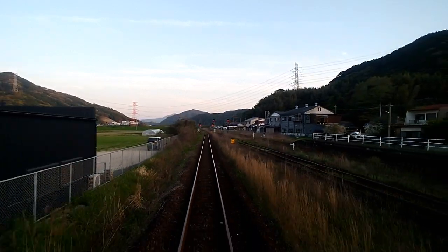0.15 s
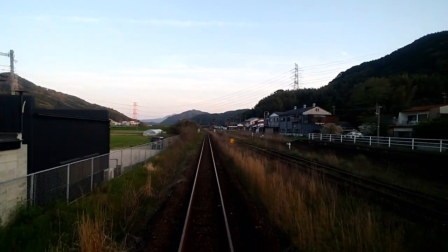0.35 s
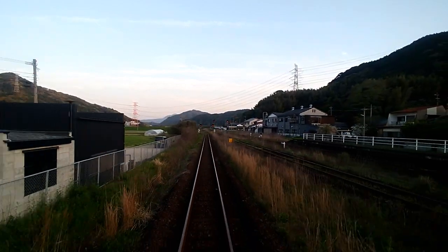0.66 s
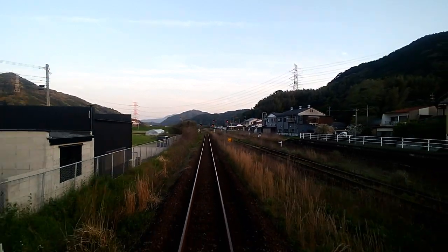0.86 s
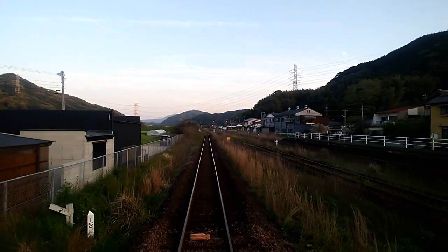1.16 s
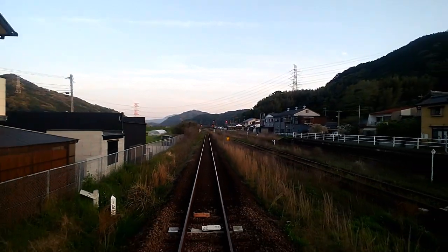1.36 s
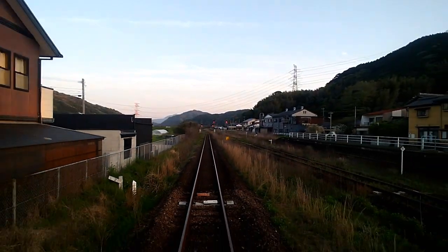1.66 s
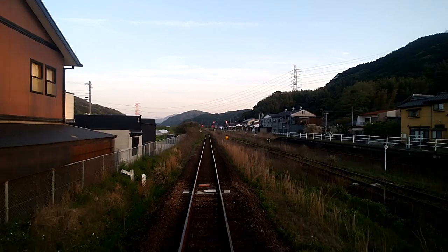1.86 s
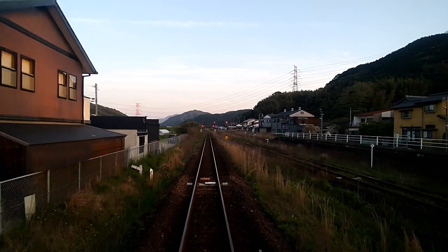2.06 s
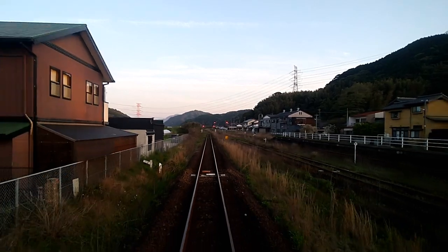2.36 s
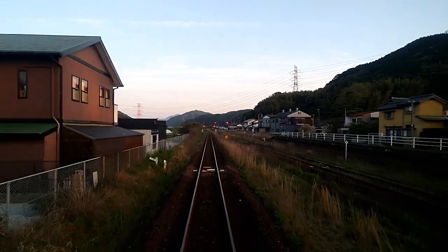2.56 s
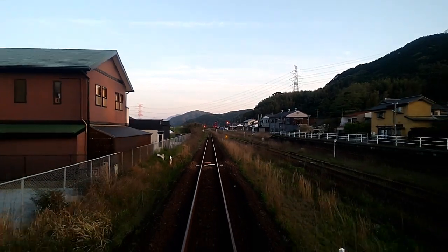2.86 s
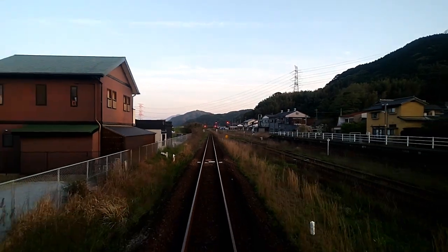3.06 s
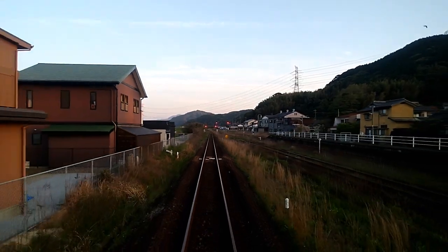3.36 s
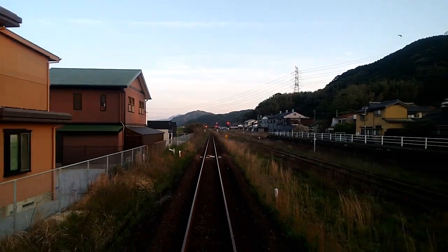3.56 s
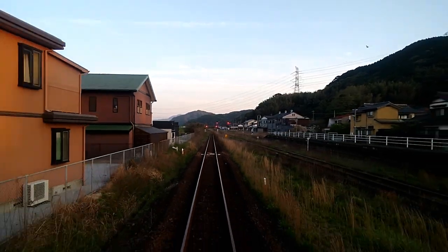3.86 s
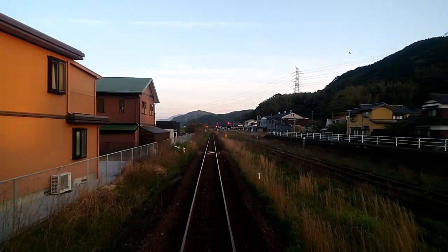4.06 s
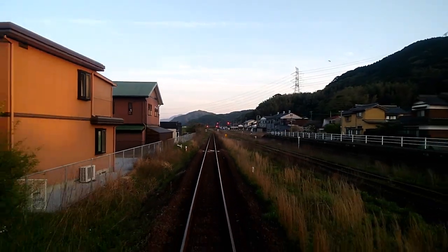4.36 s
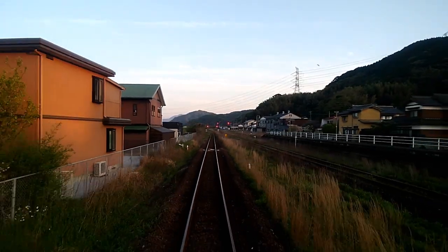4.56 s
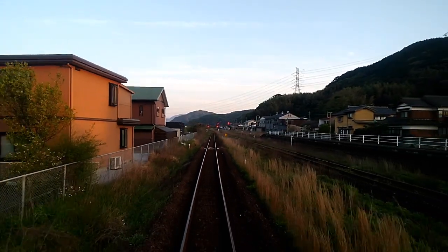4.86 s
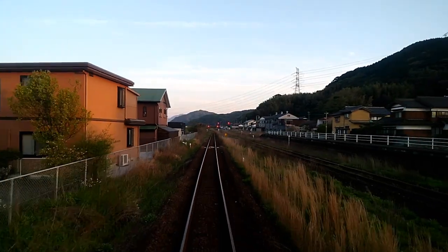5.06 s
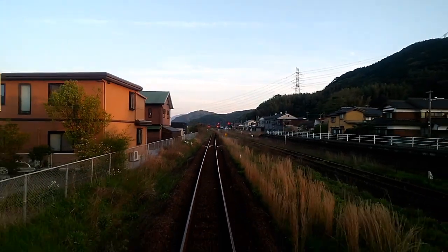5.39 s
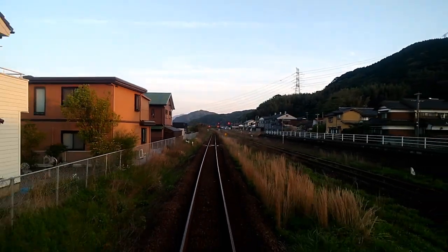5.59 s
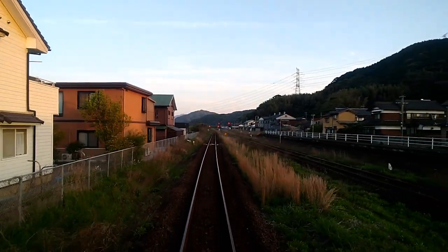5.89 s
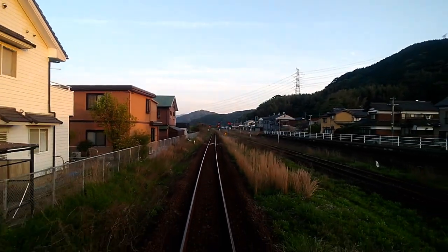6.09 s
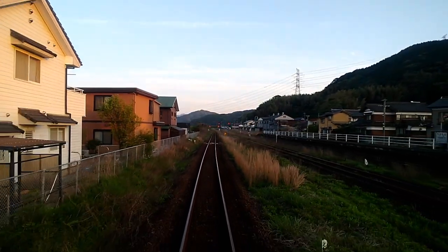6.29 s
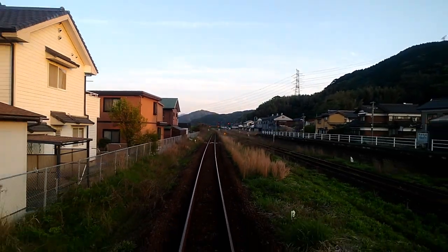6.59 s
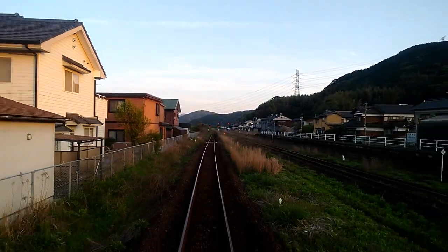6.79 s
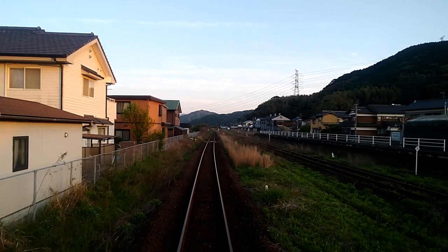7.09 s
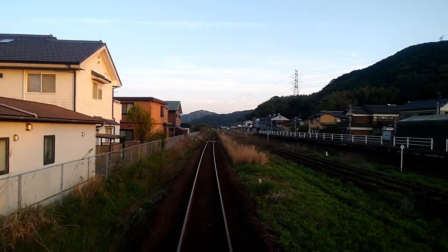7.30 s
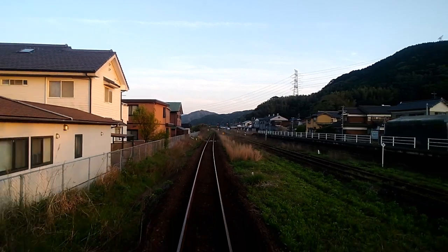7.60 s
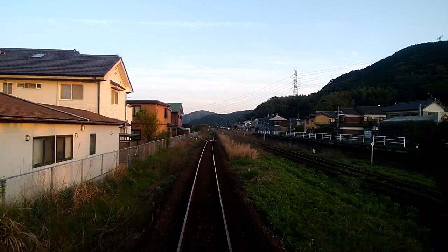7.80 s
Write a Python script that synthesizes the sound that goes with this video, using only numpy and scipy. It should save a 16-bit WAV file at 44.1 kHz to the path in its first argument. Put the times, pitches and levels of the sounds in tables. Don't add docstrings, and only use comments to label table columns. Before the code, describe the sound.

Inside the front cab of a slow diesel railcar, a deep boom and rolling roar run throughout. At first a brake shoe rubs a wheel, making a thin, very high wavering squeal and dry hiss; after about a second and a half it lets go with a soft air sigh. Wheels thump unevenly over rail joints, setting loose panes chattering and trim ticking. Close stereo microphone in the cab.

```python
import sys
import numpy as np
from scipy import signal
from scipy.fft import rfft, irfft, next_fast_len
from scipy.io import wavfile
from scipy.ndimage import uniform_filter1d

SR = 44100
rng = np.random.default_rng(int(sys.argv[2]) if len(sys.argv) > 2 else 0)


def master_out(mix):
    frames = np.transpose(np.atleast_2d(mix))
    ceiling = np.clip(frames, -1, 1)
    pcm = np.round(ceiling * 32767).astype(np.int16)
    wavfile.write(sys.argv[1], SR, pcm)


def voltage_ratio(decibels):
    exponent = np.asarray(decibels, float) / 20
    return 10 ** exponent


N = 350154
TIME = np.arange(N) / SR
SLOW = TIME[::32]
LONG = next_fast_len(N, real=True)
HZ = np.maximum(np.fft.rfftfreq(LONG, 1 / SR), 1)
LEFT_RIGHT = np.array([[1], [-1]])
SWING_S = 0.0111


def unit(x):
    return x / np.sqrt(np.mean(np.abs(x) ** 2))


def curves(rows):
    s, *columns = np.transpose(rows)
    return [np.interp(TIME, s, column) for column in columns]


def over_hz(points):
    hz, value = np.transpose(points)
    return np.interp(np.log(HZ), np.log(np.maximum(hz, 1)), value)


def walk(rate_hz):
    hold = int(SR / rate_hz)
    steps = np.repeat(rng.standard_normal(N // hold + 1), hold)
    return unit(uniform_filter1d(uniform_filter1d(steps, hold), hold)[:N])


def spell(start_s, rise_s, fall_db_s):
    t = np.maximum(TIME - start_s, 0)
    return (1 - np.exp(-t / rise_s)) * voltage_ratio(-fall_db_s * t)


def sing(hz, width_hz, steady, order=2):
    pole = np.exp(-np.pi * width_hz * SLOW[1])
    push = rng.standard_normal(2 * len(SLOW)) + 1j * rng.standard_normal(2 * len(SLOW))
    swing = unit(signal.lfilter([1], np.poly([pole] * order), push)[len(SLOW):])
    swing = unit(swing / (abs(swing) + .1) ** steady)
    turn = np.exp(2j * np.pi * np.cumsum(hz + 0 * TIME) / SR)
    return np.sqrt(2) * np.interp(TIME, SLOW, swing) * turn


def spread(first, second, like, pan_db):
    like = np.clip(like, 0, .99)
    pair = first + LEFT_RIGHT * np.sqrt((1 - like) / (1 + like)) * second
    return np.real(pair) * voltage_ratio(LEFT_RIGHT * pan_db / 2)


# hz, likeness (0-1)
LIKENESS = [(60, 0.9), (130, 1), (280, 0.82), (610, 0.7), (1320, 0), (2860, 0.1), (6190, 0), (13400, 0)]
# hz, left_minus_right_db
LEAN = [(60, 1), (110, -1.5), (200, 0), (360, -1), (660, -1), (1210, 6), (2210, -1.5), (4030, 1.5),
        (7350, -2), (13400, -8)]


def stereo_noise(colour, band_hz, flicker_db, source=None):
    if source is None:
        source = rng.standard_normal((2, N))
    mid, side = rfft(source, LONG)
    like = np.clip(over_hz(LIKENESS), 0, .99)
    pair = np.sqrt(1 + like) * mid + LEFT_RIGHT * np.sqrt(1 - like) * side
    pair = pair * voltage_ratio(over_hz(colour) + LEFT_RIGHT * over_hz(LEAN) / 2)
    low_hz, high_hz = colour[0][0], colour[-1][0]
    pair = pair * ((HZ > low_hz) & (HZ < high_hz))
    inside = irfft(pair.mean(axis=0) * ((HZ > band_hz[0]) & (HZ < band_hz[1])), LONG)
    out, place = 0, 2 * np.log2(HZ)
    for centre in np.arange(np.floor(2 * np.log2(low_hz)), 2 * np.log2(high_hz) + 1, 2):
        band = pair * np.clip(1 - abs(place - centre) / 2, 0, 1)
        out = out + irfft(band, LONG)[:, :N] * voltage_ratio(flicker_db * walk(9))
    return out / np.sqrt(np.mean(inside ** 2))


# start_s, pitch_hz, gain_db, half_length_s
SWELLS = [(.5, 752, -4, .6), (1.25, 752, 4, .12), (1.83, 752, 8, .12), (3.07, 752, 6, .1),
          (4.3, 752, 5, .2), (5.55, 752, 3, .1), (6.65, 752, 3, .1), (1.1, 238, 5, .1), (1.42, 238, 6, .07),
          (1.78, 238, 6, .07), (2.55, 238, 4, .1), (3.4, 238, 6, .07), (5.45, 238, 7, .13),
          (6.6, 238, 4, .1), (1.55, 560, 6, .15), (2.35, 560, 9, .08), (2.93, 560, 7, .06),
          (.9, 1453, 4, .1), (3.62, 1453, 4, .05), (5.7, 1453, 3, .4), (.045, 5324, 4, .04),
          (.2, 5324, 4, .06), (.7, 5324, 4, .1), (.88, 5324, -4, .05), (1.1, 5324, 4, .08),
          (1.28, 5324, -6, .07), (.2, 10717, 6, .05), (.33, 10717, -3, .06), (.5, 10717, 3, .05),
          (.82, 10717, 5, .08), (1.0, 10717, -3, .07), (1.14, 10717, 4, .04), (1.29, 10717, 7, .05),
          (3.6, 6000, 5, .2), (4.9, 6000, 5, .3), (6.9, 6000, 5, .3)]


def swells(hz):
    near = [row for row in SWELLS if abs(np.log(row[1] / hz)) < np.log(2) / 16]
    return sum(db * np.exp(-((TIME - s) / half_s) ** 2) for s, _, db, half_s in near)


# start_s, thump_peak_db, lower_shell_kick_db, upper_shell_kick_db
JOINTS = [(0.0, -36, -33, -23), (0.16, -18, -32, -23.5), (0.6, -37, -28, -32), (.9, -45, -28, -33),
          (1.17, -38, -30, -33), (1.545, -31.5, -23, -28.5), (1.8, -45, -30, -29), (1.95, -45, -25, -36),
          (2.15, -46, -30, -27), (2.47, -34, -30, -30), (2.72, -45, -33, -27), (2.855, -24, -21, -31),
          (3.092, -19, -35, -32), (3.165, -44.5, -40, -20), (3.3, -45, -36, -29), (3.55, -42, -33, -27),
          (3.92, -42, -27, -29.5), (4.2, -46.5, -34, -29.5), (4.371, -46, -30, -30), (4.619, -35, -28, -36),
          (4.72, -45, -26, -36), (4.98, -38, -36.5, -31.5), (6.05, -27.5, -22, -33),
          (6.278, -22.5, -30, -30), (6.34, -38, -21, -30), (6.48, -45, -25, -33), (6.589, -45, -38, -22),
          (6.86, -35.5, -36, -34.5), (7.2, -42.5, -35.5, -32.5)]
KICK_FALL_DB_S = [30, 15]


def shell_swings():
    rest_db, lead_s, rise_s = -35, .01, .0082
    swings = []
    for mode, fall_db_s in enumerate(KICK_FALL_DB_S):
        kicks = sum((voltage_ratio(row[2 + mode]) * spell(row[0] - lead_s, rise_s, fall_db_s)) ** 2 for row in JOINTS)
        swings.append(np.sqrt(voltage_ratio(2 * rest_db) + kicks))
    return swings


# start_s, lower_pitch_hz, upper_pitch_hz
SHELL_PITCH = [(0, 88.1, 108.1), (.5, 82.02, 114.9), (1.56, 72.98, 110.1), (1.78, 87.87, 115.8),
               (2.1, 90, 112), (2.5, 80, 114), (2.86, 78.98, 116), (3.06, 100, 114), (3.249, 86, 117),
               (3.75, 84.02, 112.1), (4.0, 94.06, 118), (4.4, 84, 114), (4.78, 91.9, 116),
               (5.2, 84.9, 118.9), (6.05, 86, 105.9), (6.4, 97, 108), (6.7, 84, 110), (7.94, 82, 113)]
# width_hz, steadiness (0-1)
SHELL = [(15, .55), (9, .9), (22, 0.4)]


def boom(swings):
    gains = swings + [voltage_ratio(-15.5) * np.hypot(*swings)]
    pitches = curves(SHELL_PITCH) + [148]
    out = 0
    for gain, hz, (width_hz, steady) in zip(gains, pitches, SHELL):
        mode = spread(sing(hz, width_hz, steady), sing(hz, 2 * width_hz, .2), 0.97, -1.0)
        out = out + gain * voltage_ratio(1.1 * walk(7)) * mode
    return np.tanh(4.5 * out) / 4.35


# hz, level_db (per Hz)
PANELS = [(12, -61.5), (20, -27), (32, -35), (48, -28.5), (57, -30.5), (68, -1.5), (107, 1), (129, 1),
          (147, -8), (177, -14), (203, -20), (236, -15), (275, -23), (344, -35), (400, -33.5), (520, -58),
          (880, -120)]
# hz, level_db (per Hz)
ROAR = [(160, -35.5), (280, -1.5), (450, -7), (590, -6), (800, -11), (1300, -17), (1600, -14), (2400, -26),
        (3000, -30.5), (3700, -36), (5400, -44.5), (6300, -47), (11400, -56.5), (16000, -70)]
# pitch_hz, width_hz, level_db
FRAME = [(238, 15, -49), (413.6, 20, -57.5), (491, 26, -59.5), (560, 30, -63), (752, 12, -62.5),
         (1453, 44, -64), (2850, 300, -76), (4600, 410, -88), (5220, 45, -88), (6000, 25, -94)]


def body():
    swings = shell_swings()
    shake_db = 20 * np.log10(np.hypot(*swings)) + 25
    jolt = sum(np.exp(-((TIME - s - .02) / .11) ** 2) * np.clip((db + 47) / 25, 0, 1) for s, db, _, _ in JOINTS)
    braking = np.clip((RELEASE_S - TIME) / 0.26 + 1, 0, 1)
    panel_db = -39 + 0.55 * shake_db + 1.5 * walk(6)
    roar_db = -50.5 + 0.14 * shake_db + 2.5 * jolt + 2.5 * braking
    gap = [(hz, db - 7.3 * (65 < hz < 135)) for hz, db in PANELS]
    out = boom(swings)
    out = out + voltage_ratio(panel_db) * stereo_noise(gap, (150, 350), 1.7)
    out = out + voltage_ratio(roar_db) * stereo_noise(ROAR, (400, 2500), 1.3)
    for hz, width_hz, db in FRAME:
        ring = spread(sing(hz, width_hz, 0.1), sing(hz, width_hz, 0.18), min(150 / hz, 1), 0)
        out = out + voltage_ratio(db + swells(hz) + 1.2 * walk(5)) * ring
    return out


# pitch_hz, level_db, t60_s
THUMP = [(121, -9, 0.2), (145, 5, 0.16), (184.8, 5.5, 0.12), (215, 6.5, 0.14), (249, 3.5, .11),
         (300, -1, 0.1), (382, -7, 0.082), (473, -8, 0.12), (601, -9, .08), (865, -12, .07)]


def joints():
    out, t = np.zeros(N), TIME[:SR // 2]
    push = (1 - np.exp(-t / .02)) ** 2
    chance = rng.standard_normal((len(JOINTS), len(THUMP), 3))
    for (s, peak_db, _, _), draw in zip(JOINTS, chance):
        ring = 0
        for (hz, db, t60_s), (louder, sharper, phase) in zip(THUMP, draw):
            wave = np.sin(2 * np.pi * hz * (1 + 0.038 * sharper) * t + np.pi * phase)
            ring = ring + voltage_ratio(db + 1.7 * louder) * wave * 1000. ** (-t / (1.5 * t60_s))
        i = int(s * SR)
        out[i:i + len(t)] += (voltage_ratio(peak_db - 1.5) * ring * push)[:N - i]
    return spread(out, 0, .9, -1.0)


# start_s, peak_db
HEAVES = [
    (0.019, -31),
    (1.58, -33),
    (4.65, -33),
    (7.74, -37),
]


def heaves():
    heave_hz, half_s = 50, .07
    out = 0
    for s, db in HEAVES:
        t = TIME - s
        out = out + voltage_ratio(db) * np.exp(-(t / half_s) ** 2) * np.sin(2 * np.pi * heave_hz * t)
    return out


RELEASE_S, RELEASE_DB_S = 1.465, 298

# start_s, strongest_ring_db, split_of_that_ring_hz
GRIP = [
    (0.0, -49.5, 34),
    (0.16, -43, 44),
    (0.29, -49.5, 34.5),
    (.37, -44.5, 14.2),
    (.47, -50.5, 44.6),
    (0.62, -45.5, 42),
    (0.87, -49.5, 44),
    (1.1, -46, 23.7),
    (1.23, -38, 11.9),
    (1.45, -48.5, 16),
]
WHEEL_HZ = [7869, 5324, 10717, 3084, 13910, 8431, 6589, 12941]
WHEEL_WIDTH_HZ = [15, 15, 11, 20, 22, 20, 20, 20]
# level_db (against its drive), drive (whole part counts), left_minus_right_db, likeness (0-1)
WHEEL = [(-8.5, 0, -0.5, 0.48), (2, 1, 3, 0.1), (1, 2, -8, .2), (-13, 1, 3, .2), (-25, 1.6, 1, .3),
         (-32, 0, -7, .2), (-21, 1.2, -3, .2), (-33.5, 1.4, -2, .2)]
RING_WANDER_DB = [1.6, .8, 1.0]


def wheel_rings():
    after_s = np.maximum(TIME - RELEASE_S, 0)
    lift_db = np.maximum(-RELEASE_DB_S * after_s, -22 - 45 * after_s)
    level_db, split_hz = curves(GRIP)
    grip_db = level_db + 48
    drives = [db - 47.5 + share * grip_db + wander_db * walk(12.13) + lift_db
              for db, share, wander_db in zip([1.5, -7.5, -11], [0.99, -0.19, .3], RING_WANDER_DB)]
    out = 0
    for hz, width_hz, (db, drive, pan_db, like) in zip(WHEEL_HZ, WHEEL_WIDTH_HZ, WHEEL):
        first, second = (sing(hz, width_hz, .25, order=1) for _ in range(2))
        out = out + voltage_ratio(drives[int(drive)] + db + swells(hz)) * spread(first, second, like, pan_db)

    def twins():
        lower = sing(WHEEL_HZ[0] - split_hz / 2, 10.2, 0.57)
        upper = sing(WHEEL_HZ[0] + 0.99 * split_hz / 2, 10.2, 0.57)
        return lower + voltage_ratio(-2) * upper

    _, _, pan_db, like = WHEEL[0]
    out = out + voltage_ratio(drives[0] - 1.5) * spread(twins(), twins(), like, pan_db)
    return out * (1 + 0.079 * np.real(sing(107, 8, .5)))


# start_s, rise_s, level_db, fall_db_per_s
GRABS = [
    (0.03, .01, -61, 58),
    (0.224, .003, -54, 220),
    (0.427, .004, -51, 150),
    (0.76, .03, -64.5, 40.5),
    (1.11, .005, -64, 147),
]
# hz, level_db (per Hz)
GRAB_COLOUR = [(2500, -21), (4300, -6.5), (5500, -4.5), (7000, -2), (9500, -1), (11300, -4.5), (12300, -18),
               (13500, -40)]
# hz, level_db (per Hz)
RUB_COLOUR = [(1800, -5), (2300, -9.5), (3050, 0.5), (3600, -8.5), (4700, -3.5), (5300, -4), (6300, -3.5),
              (7200, 0), (8500, -0.5), (11100, -3.5), (12000, -16), (13200, -13), (14300, -52),
              (16000, -62)]


def shoe_rub():
    lingers_s = .015
    after_s = np.maximum(TIME - RELEASE_S - lingers_s, 0)
    rub_db = -62 - RELEASE_DB_S * after_s + 1.2 * walk(25)
    grab = sum(voltage_ratio(db) * spell(s, rise_s, fall_db_s) for s, rise_s, db, fall_db_s in GRABS)
    hiss = grab * stereo_noise(GRAB_COLOUR, (8600, 10400), 1.5)
    return hiss + voltage_ratio(rub_db) * stereo_noise(RUB_COLOUR, (8600, 10400), 1.8)


# hz, level_db (per Hz)
AIR_COLOUR = [(1400, -32.5), (2500, -13), (2970, 1.5), (3590, -15), (4350, -4.5), (4750, -9.5), (5600, -14),
              (6800, -9), (8050, -8.5), (10500, -13.5), (13000, -26), (16000, -35.5)]


def brake_air():
    return voltage_ratio(-65.5) * spell(1.49, 0.018, 12) * stereo_noise(AIR_COLOUR, (3500, 12000), 1.9)


# start_s, length_s, level_db, low_part_db, fade_within_swing_db
CHATTER = [(2.8653, .03, -56, -8.5, 11.5), (2.886, .01, -55, -2.5, 7), (2.901, .028, -49.5, -3.5, 8.5),
           (2.9324, .052, -45, -2.5, 7), (3.056, .02, -60, 1, 4), (3.150, .018, -64.5, 3.5, 2.5),
           (3.17, .011, -50, 3, 5.5), (3.187, 0.027, -54, 5, 2.5), (3.314, .01, -64, 9, 2),
           (4.398, .01, -61, 4, 4), (4.612, .012, -62, 7.5, 2), (5.645, .005, -68, 16, 3),
           (6.0605, .006, -48.5, 8, 4.5), (6.073, .022, -49.5, 1, 3.5), (6.106, .018, -53, 5.5, 3.5),
           (6.135, .02, -58, 5.5, 3), (6.32, 0.025, -61, 5.5, 3.5), (6.35, .018, -51.5, 2, 2.5),
           (6.373, .02, -57.5, 1, 2), (6.396, .038, -50, 4, 2.5), (6.441, 0.028, -60.5, 4.5, 4.5),
           (6.606, .008, -59, 7.5, 3)]
# hz, level_db (per Hz)
PANE_HIGH = [(4000, -40), (6200, -13.5), (7100, -2), (8000, -4), (8900, -1.5), (9700, -1), (11200, -10),
             (11900, -9.5), (12600, -12), (16000, -19)]
# hz, level_db (per Hz)
PANE_LOW = [(800, -11), (1500, 9), (1850, 9.5), (2150, 5), (2500, -7.5), (2950, 1.5), (3400, -8.5),
            (3800, -4.5), (4200, -5), (4600, -8), (5100, -11), (5800, -23.5)]
# pitch_hz, width_hz, level_db (against the duller part)
PANE_RINGS = [(1620, 70, -7), (1800, 65, -5.5), (2930, 110, -6), (3830, 70, -5), (4700, 140, -12),
              (5270, 90, -16)]


def chatter():
    rise_s, fall_s = .0012, .009
    knocks = rng.standard_normal((2, 2, N)) * voltage_ratio(4.2 * np.minimum(rng.exponential(size=(2, 1, N)), 5))
    high, low = np.zeros(N), np.zeros(N)
    for s, length_s, level_db, low_db, fade_db in CHATTER:
        t = np.maximum(TIME - s, 0)
        swing = np.minimum(t, length_s) / SWING_S % 1
        edges = (1 - np.exp(-t / rise_s)) * np.exp(-np.maximum(t - length_s, 0) / fall_s)
        shape = voltage_ratio(level_db - 11.5 - fade_db * swing) * edges
        high = np.hypot(high, shape)
        low = np.hypot(low, shape * voltage_ratio(low_db + 2 + .5 * fade_db * (swing - 1.5)))
    keep = np.exp(-1 / (0.13 * SR))

    def linger(level, tail_db):
        tail = signal.lfilter([3 * (1 - keep)], [1, -keep], level ** 2)
        return np.sqrt(level ** 2 + voltage_ratio(2 * tail_db) * tail)

    low, high = linger(low, -13), linger(high, -19)
    rings = sum(voltage_ratio(db) * spread(sing(hz, width_hz, .1), sing(hz, width_hz, .1), .3, -1.0)
                for hz, width_hz, db in PANE_RINGS)
    bright = high * stereo_noise(PANE_HIGH, (8300, 10400), 1.3, knocks[0])
    dull = low * voltage_ratio(-1.1) * stereo_noise(PANE_LOW, (2500, 5000), 2.2, knocks[1])
    return low * rings + bright + dull


# start_s, length_s, peak_db
TICKS = [(.028, .085, -37.5), (0.195, .005, -30), (0.21, .005, -43), (0.223, .027, -41), (0.374, .005, -44),
         (1.1165, .027, -41), (1.553, .005, -51), (1.614, .005, -57.5), (2.21, .005, -57),
         (2.4946, .005, -61), (2.6004, .005, -59), (2.6553, .016, -59), (2.8538, .027, -59.5),
         (3.0905, .005, -59), (3.1302, .005, -57), (3.353, .005, -59), (3.376, .005, -59.5),
         (3.5638, .005, -61), (3.6436, .005, -60), (3.678, .005, -59), (3.7838, .005, -59),
         (5.647, .005, -60.5), (6.042, .005, -65), (6.263, .005, -63), (6.304, .005, -53),
         (6.488, .016, -57), (6.551, .016, -53), (6.918, .005, -55), (7.041, .005, -55),
         (7.1382, .027, -55), (7.1991, .038, -58.5), (7.349, .016, -59), (7.3911, .005, -59),
         (7.4235, .016, -61.5), (7.49, .016, -59), (7.526, .005, -61), (7.554, .005, -58),
         (7.5822, .016, -60), (7.61, .027, -61), (7.665, .038, -60.5), (7.737, .005, -61.5)]
# start_s, rise_s, level_db, fall_db_per_s
CREAKS = [
    (1.499, 0.019, -71, 3.5),
    (2.9, 0.32, -67.5, 21.5),
    (6.1, 0.15, -73.5, 8.5),
    (7.1, .4, -75.5, 10.5),
]


def ticks():
    out, t = np.zeros((2, N + 2000)), TIME[:2000]
    shape = np.exp(-t / .0008) + .15 * np.exp(-t / .008)
    bright = signal.butter(3, [7600, 11600], "bandpass", fs=SR, output="sos")
    chance = rng.standard_normal((len(TICKS), 8, 2, len(t)))
    for (s, length_s, peak_db), run in zip(TICKS, chance):
        for late_s, grit in zip(np.arange(0, length_s, SWING_S), run):
            click = signal.sosfilt(bright, shape * (grit[0] + 0.69 * grit))
            louder, aside = grit[:, -1]
            db = peak_db - 2.5 + 3 * louder * (late_s > 0)
            db = db + LEFT_RIGHT * (-14 + 3.5 * aside) / 2
            i = int((s + late_s) * SR)
            out[:, i:i + len(t)] += click / abs(click).max() * voltage_ratio(db)
    snaps = (rng.random(N) < 1600 / SR) * voltage_ratio(1.2 * rng.exponential(size=N))
    snaps = signal.lfilter([1], [1, -np.exp(-1 / (.0012 * SR))], snaps)
    crackle = unit(signal.sosfilt(bright, snaps * rng.standard_normal((2, N))))
    busy = voltage_ratio(-92.5) + sum(voltage_ratio(db) * spell(s, rise_s, fall_db_s) for s, rise_s, db, fall_db_s in CREAKS)
    return out[:, :N] + crackle * busy * voltage_ratio(-4.5 + np.array([[-4.0], [3.0]]))


def scene():
    floor = np.tanh(3.494 * (body() + joints() + heaves())) / 3.31
    lag = 4
    late_left = np.pad(floor[0], (lag, 0), mode="edge")[:N]
    floor = np.array([late_left, floor[1]])
    return floor + wheel_rings() + shoe_rub() + brake_air() + chatter() + ticks()


def roll_off(x):
    return signal.sosfilt(signal.butter(12, 15720, fs=SR, output="sos"), x)


def record(dry):
    bass_cut = signal.butter(2, 48.5, "highpass", fs=SR, output="sos")
    return roll_off(signal.sosfilt(bass_cut, dry))


dry = scene()
out = record(dry)
master_out(out)
```